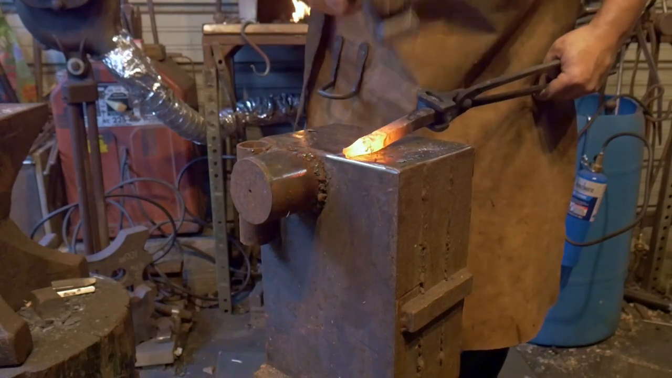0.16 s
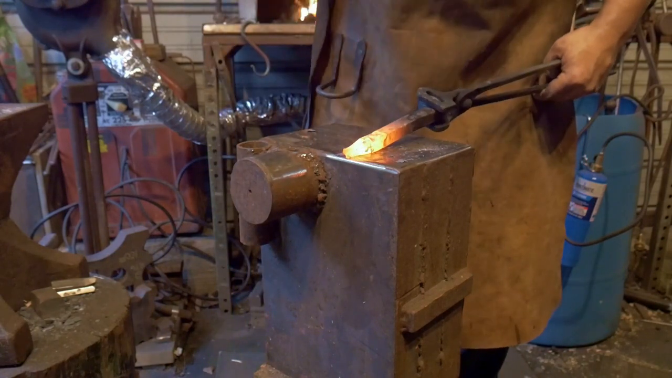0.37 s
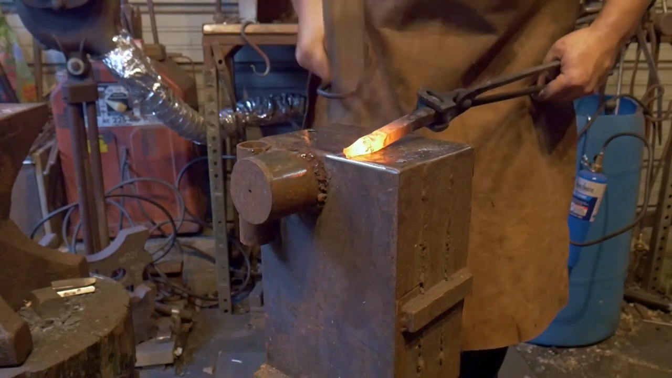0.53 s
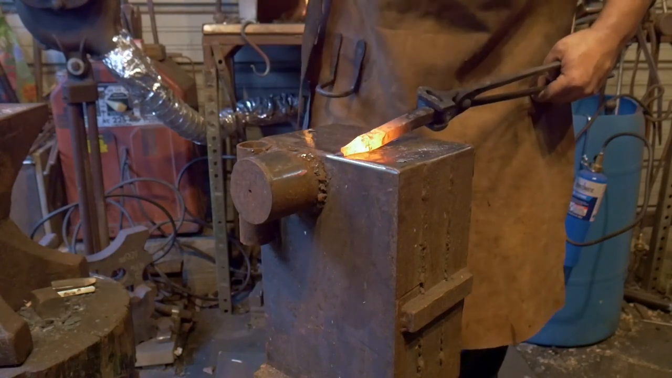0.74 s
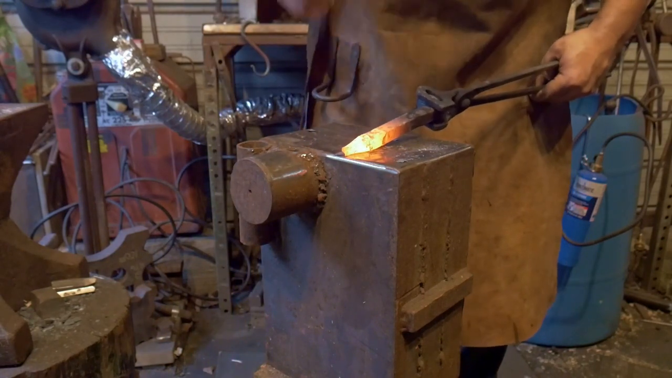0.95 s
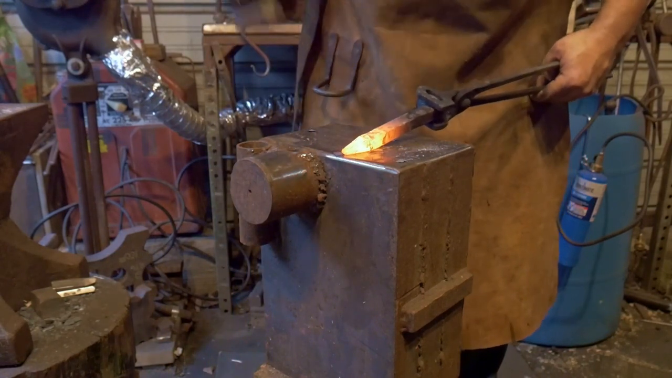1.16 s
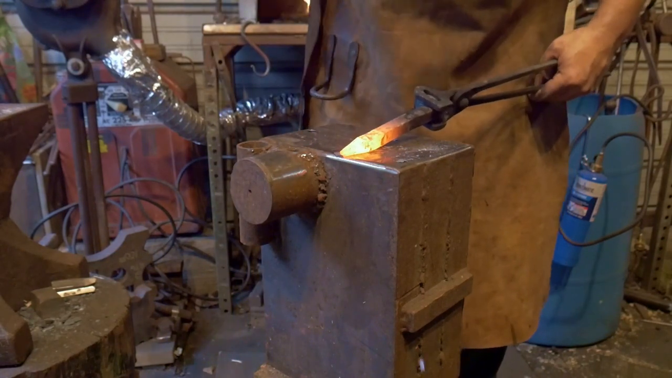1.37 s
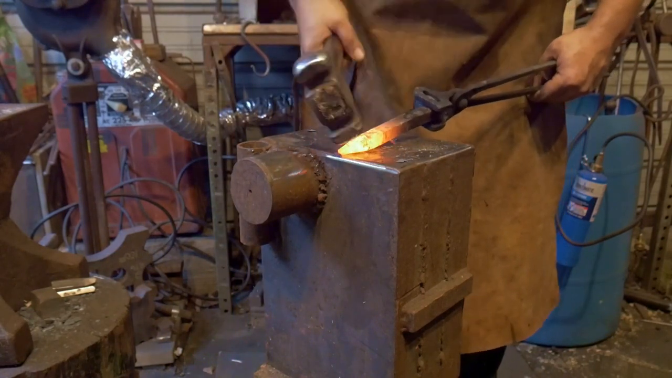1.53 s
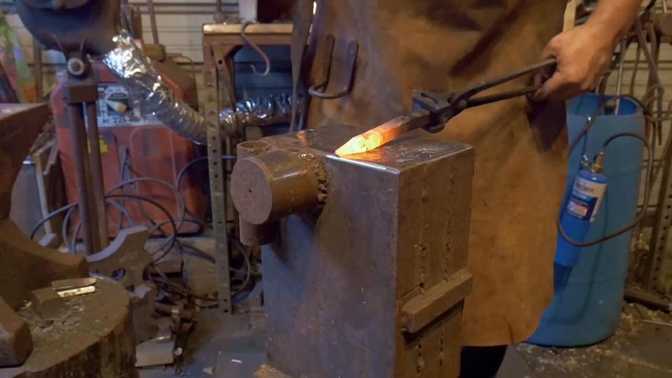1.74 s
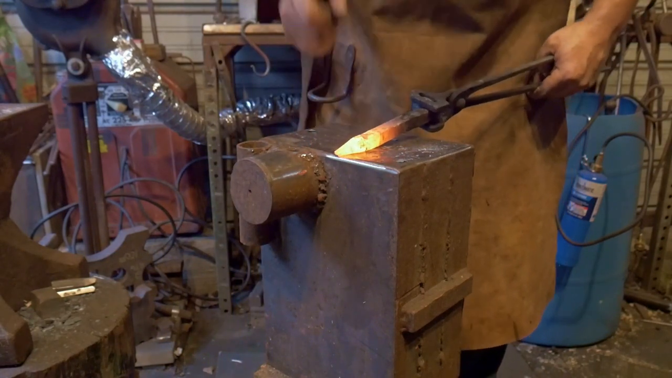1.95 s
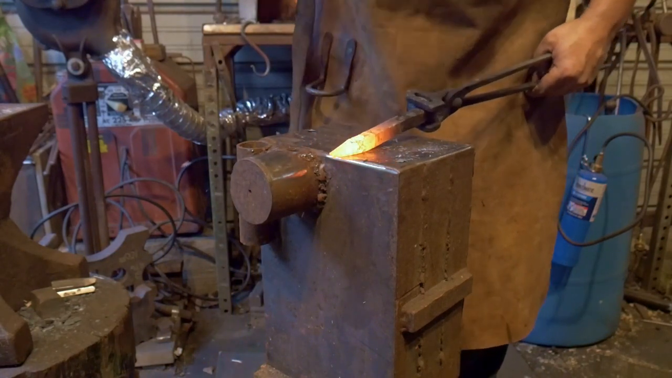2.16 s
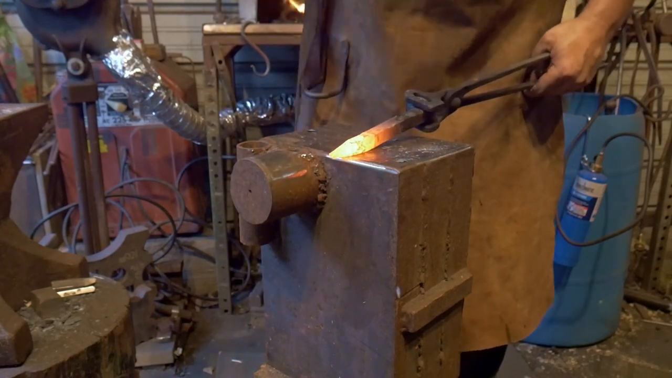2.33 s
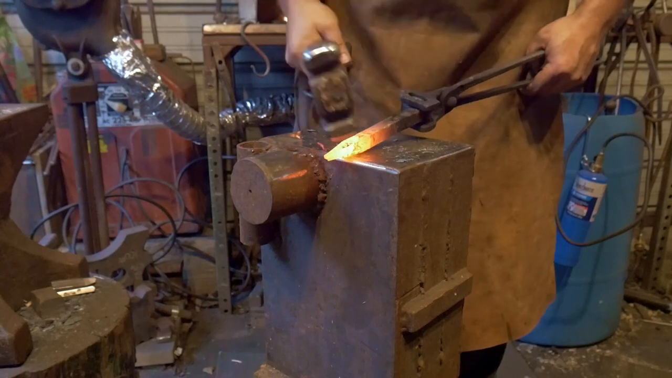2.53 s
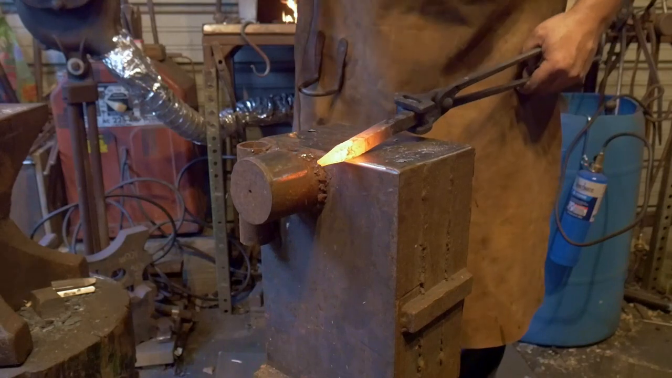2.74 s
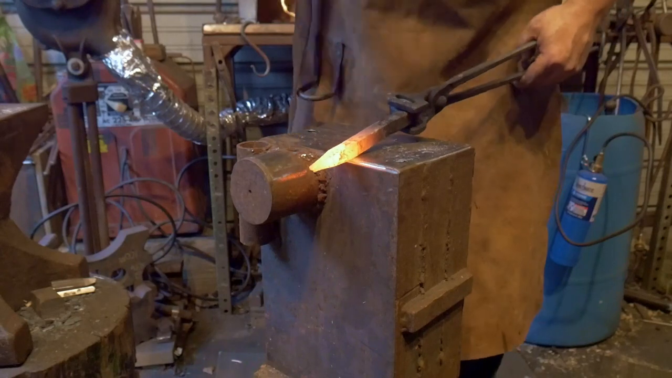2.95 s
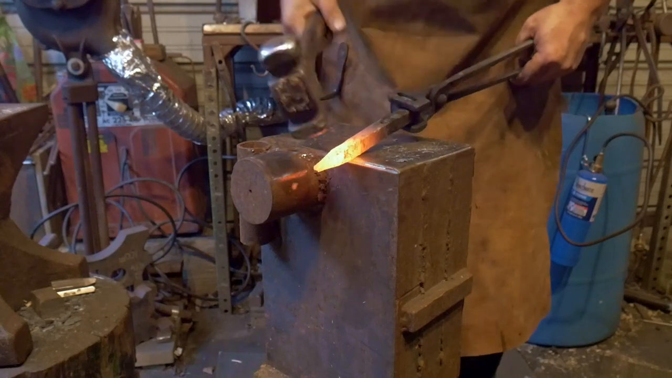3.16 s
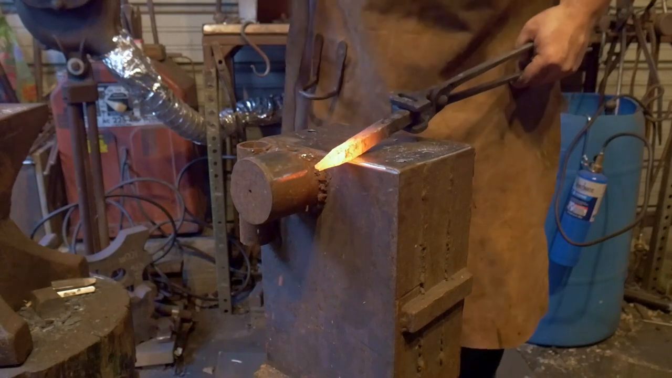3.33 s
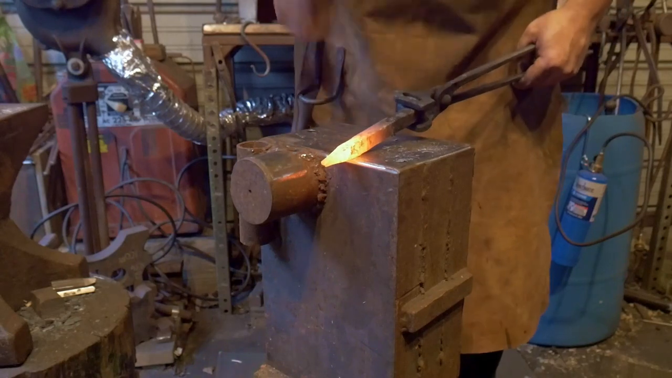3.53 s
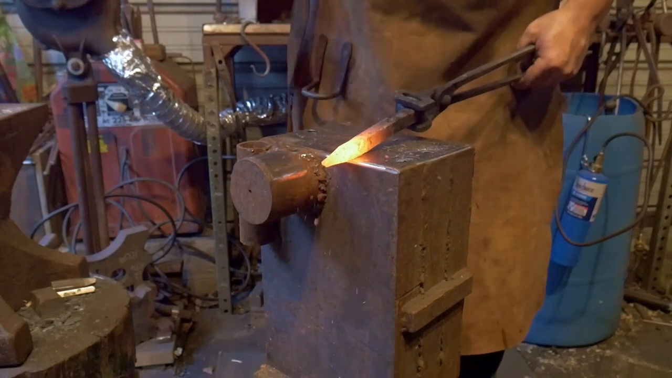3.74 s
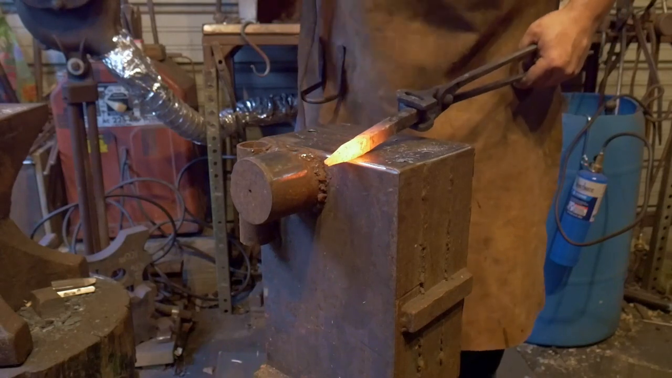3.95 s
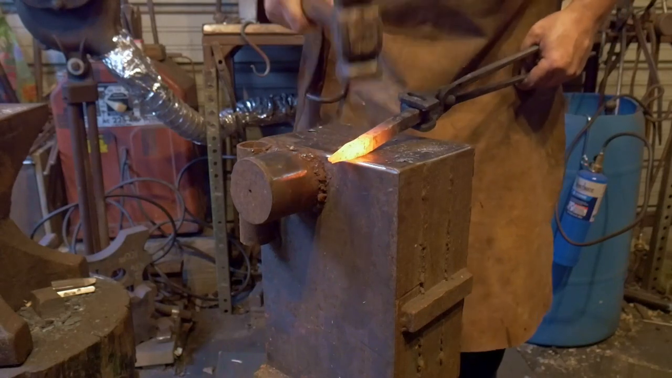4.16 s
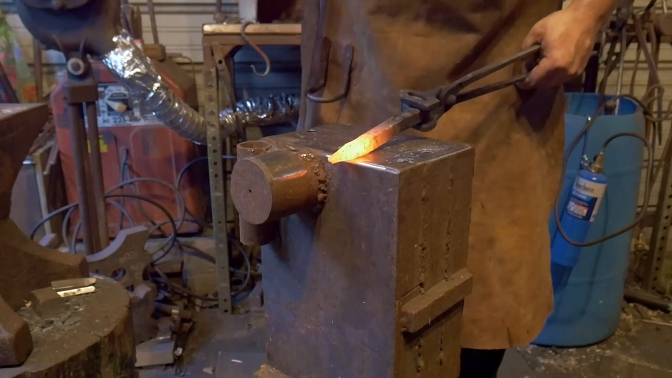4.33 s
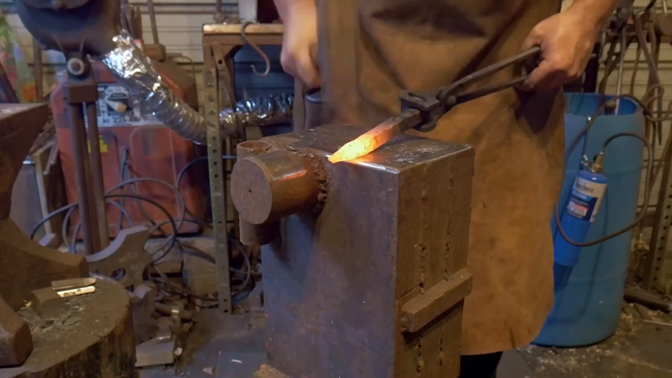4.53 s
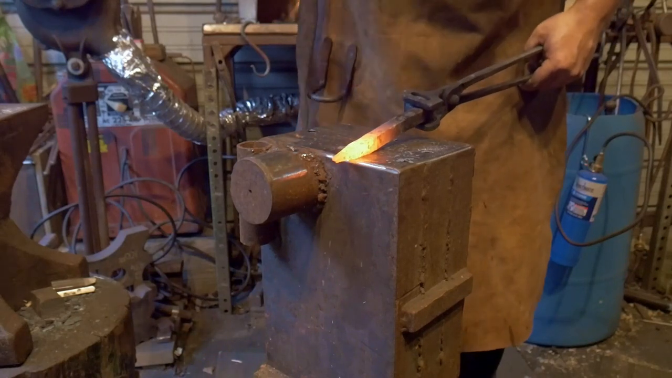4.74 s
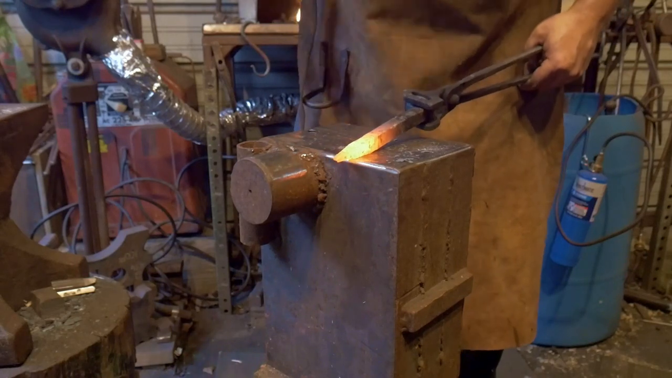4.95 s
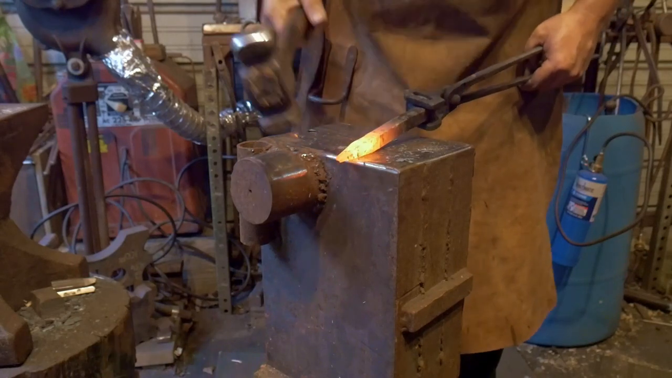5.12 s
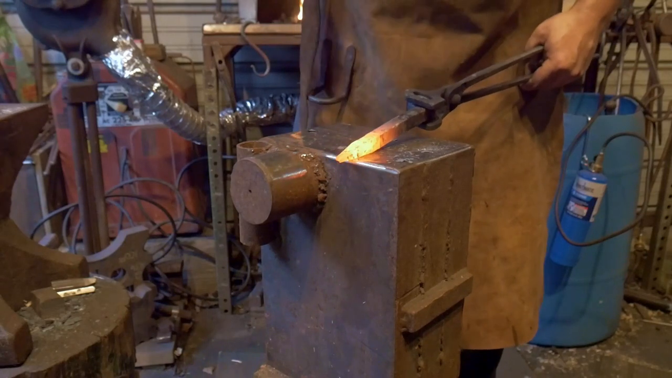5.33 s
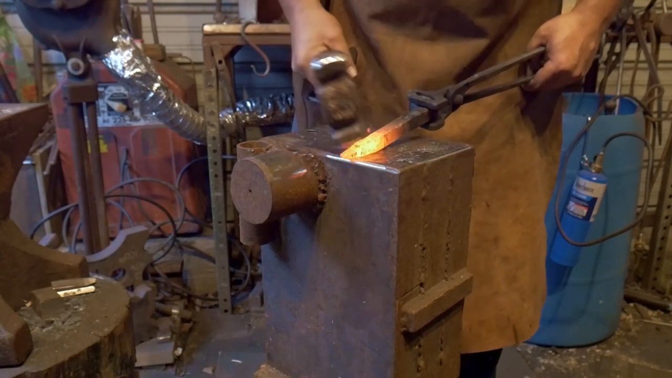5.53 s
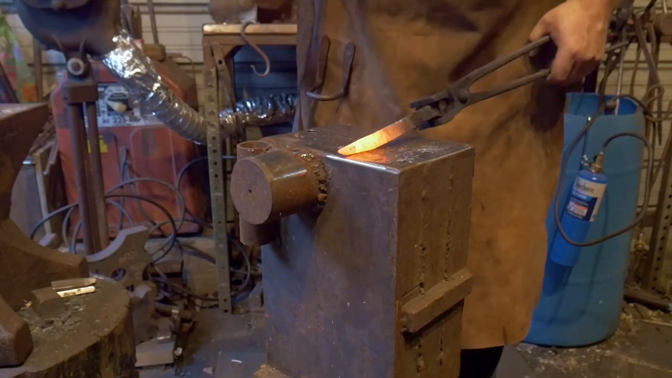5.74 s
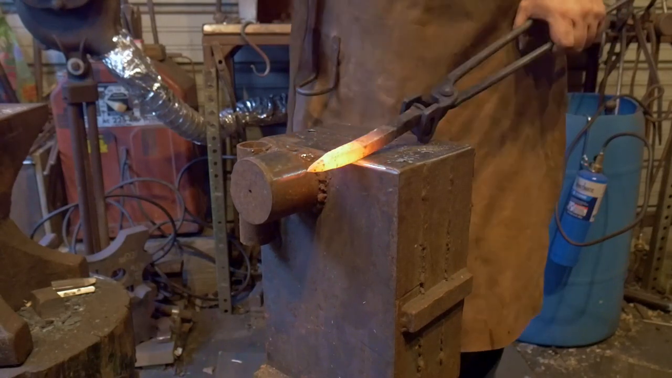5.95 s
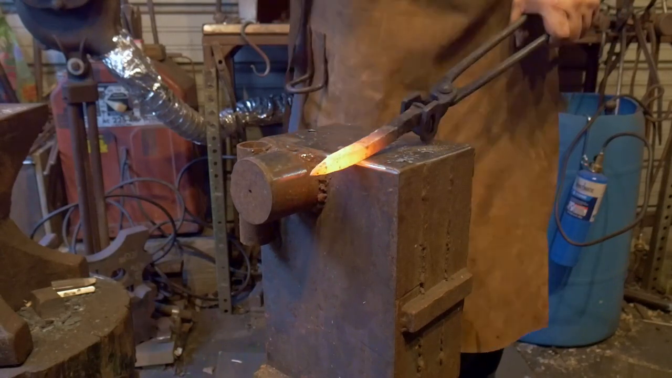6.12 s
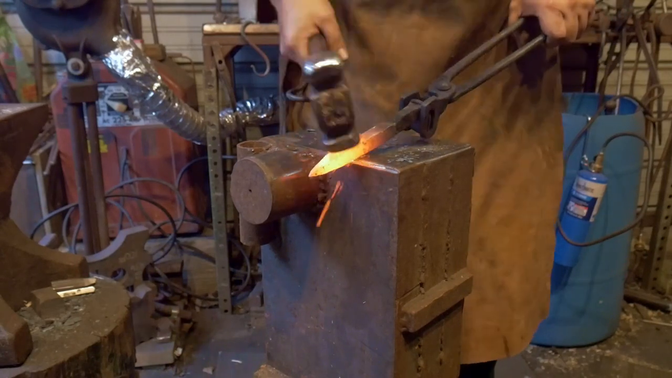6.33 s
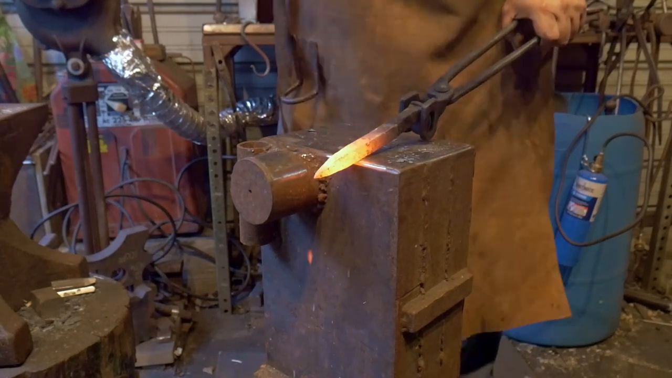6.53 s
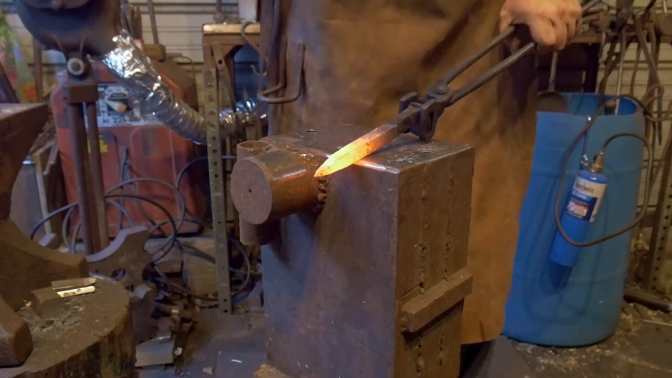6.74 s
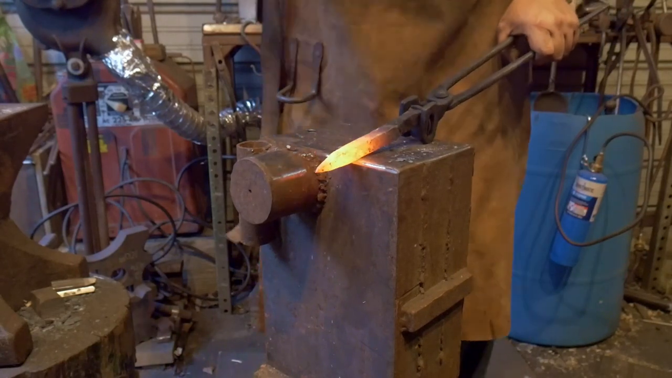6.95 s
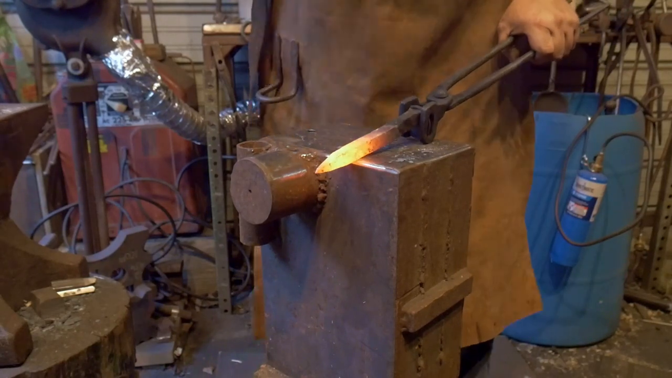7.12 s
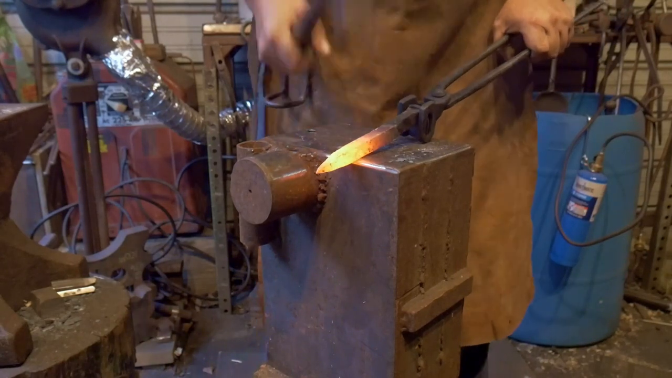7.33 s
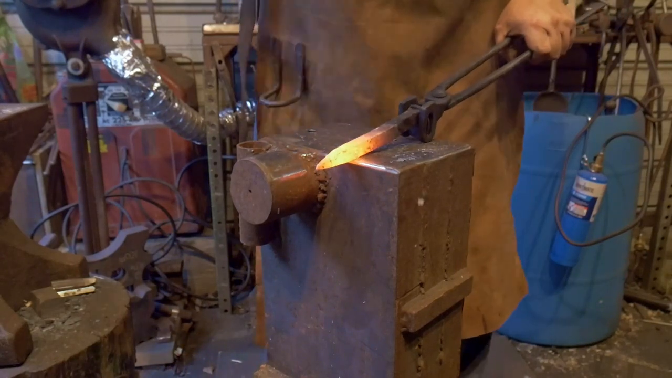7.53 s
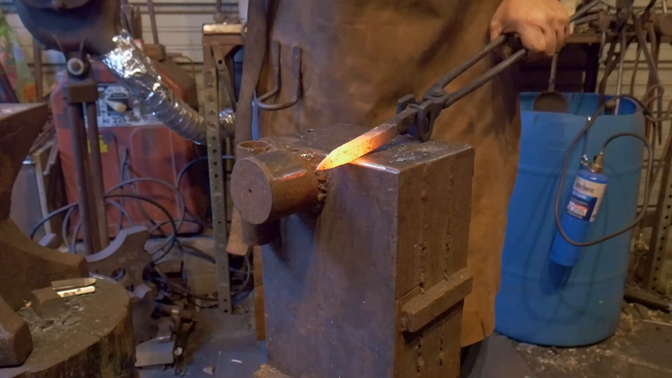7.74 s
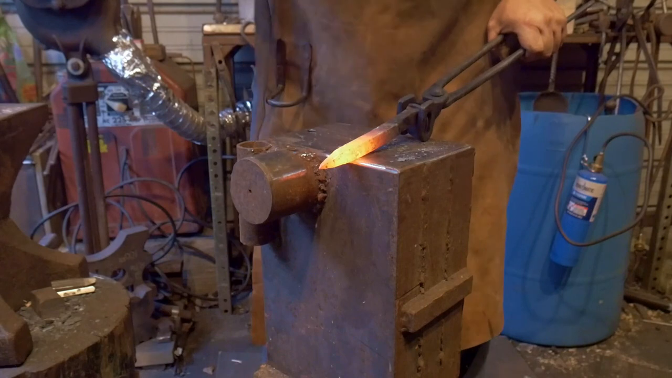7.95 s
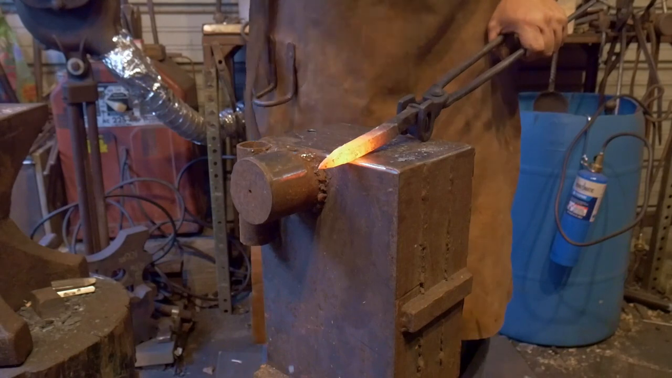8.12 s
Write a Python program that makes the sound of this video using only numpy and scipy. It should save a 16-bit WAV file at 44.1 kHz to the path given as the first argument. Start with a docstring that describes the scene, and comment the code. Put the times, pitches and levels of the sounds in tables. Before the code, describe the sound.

In a small workshop, a smith hammers a hot steel bar on a heavy block anvil, about two blows a second. Each is a loud, dry knock and bright crack with a tiny zing, then a thin high ring fading within half a second. Twelve blows come, a slightly longer pause with a quick cloth rustle, then four brighter ones. A forge murmurs faintly. The microphone is close, with hard, slightly clipped peaks.

```python
"""Smith at a block anvil

A smith draws out a hot steel bar: sixteen hand-hammer blows in a small workshop, a forge murmuring behind.
Each blow is a dull knock and a ring (dying sines), a crack of steel on steel (shaped noise) and a short zing.
Single echoes and a diffuse noise tail answer it; soft bumps and one sleeve brush are filtered noise.
The microphone limits and clips the peaks."""
import sys
import numpy as np
from scipy import signal
from scipy.fft import rfft, irfft
from scipy.io import wavfile
from scipy.ndimage import uniform_filter1d

SR = 44100
rng = np.random.default_rng(int(sys.argv[2]) if len(sys.argv) > 2 else 0)


def transcribe(signal):
    """Save signal, clipped to [-1, 1], as a 16-bit WAV file at the path in sys.argv[1]."""
    frames = np.atleast_2d(signal).T
    limited = np.clip(frames, -1, 1)
    pcm = np.round(limited * 32767).astype(np.int16)
    wavfile.write(sys.argv[1], SR, pcm)


N = 360738


def amp(db):
    """Decibels to gain."""
    return 10 ** (np.asarray(db) / 20)


def unit(x):
    """Scales to rms 1."""
    return x / np.sqrt(np.mean(x ** 2) + 1e-20)


def read(points, hz, axis=1):
    """One column of a table, joined by straight lines over log frequency."""
    columns = np.transpose(points)
    return np.interp(np.log(hz + 1), np.log(columns[0] + 1), columns[axis])


def add(mix, start_s, sound):
    """Lays a sound into the mix at start_s, cut off at the end of the mix."""
    start = max(round(start_s * SR), 0)
    part = mix[..., start:][..., :sound.shape[-1]]
    part += sound[..., :part.shape[-1]]


def noise(points):
    """Steady noise of rms 1 with the given spectrum."""
    gain = amp(read(points, np.fft.rfftfreq(N, 1 / SR)))
    return unit(irfft(rfft(rng.standard_normal(N)) * gain, N))


def colour(x, points, tilt_db_per_octave, size=1024):
    """Minimum-phase filter with the given spectrum, tilted about 6 kHz; the tilt stops below 1.5 kHz."""
    hz = abs(np.fft.fftfreq(size, 1 / SR))
    tilt_db = tilt_db_per_octave * np.log2(np.maximum(hz, 1500) / 6000)
    log_gain = np.log(amp(read(points, hz) + tilt_db))
    taps = np.fft.ifft(np.exp(np.conj(signal.hilbert(log_gain)))).real
    return signal.fftconvolve(x, taps)[:len(x)]


def modes(table, gains_db, phases, t):
    """Sum of sines, each dying by 60 dB in its t60."""
    hz, level_db, t60_s = np.transpose(table)[:, :, None]
    decay = np.exp(-np.log(1000) * t / t60_s)
    sines = np.sin(2 * np.pi * hz * t + phases[:, None])
    return (amp(level_db + gains_db[:, None]) * decay * sines).sum(0)


def forge(mid_rms_db=-51.5):
    """A soft, steady roar: noise partly alike in both ears, less so towards the treble."""
    # relative spectrum of the roar: hz, level_db (density per Hz)
    roar_spectrum = [(18, -44.5), (30, -16.5), (200, -3), (274, -7.5), (662, -8.5), (735, -9),
                     (1000, -13.5), (1090, -13.5), (1370, -14), (2430, -21.5), (2840, -20), (3880, -24.5),
                     (5880, -29), (6700, -28.5), (15000, -45.5)]
    # left-right correlation: hz, likeness (0 to 1)
    ear_likeness = [(60, 0.5), (180, 0.93), (550, 0.82), (1650, 0.68), (5000, .55), (15000, .4)]
    likeness = np.clip(read(ear_likeness, np.fft.rfftfreq(N, 1 / SR)), 0, 1)
    side_gain = np.sqrt((1 - likeness) / (1 + likeness))
    mid = noise(roar_spectrum)
    side = irfft(rfft(noise(roar_spectrum)) * side_gain, N)
    return amp(mid_rms_db) * np.array([mid + side, mid - side])


def knock(weight_db, hardness_db_per_octave, t, radiate_hz=290):
    """The blow shoves the block; cooler steel shortens the contact and favours the higher modes."""
    # heavily damped modes of block, bar and hammer while pressed together: hz, level_db, t60_s
    pressed_modes = [(500, -12, 0.017), (698.6, -19.5, 0.079), (991, -8, 0.015), (1237, -12.5, 0.027),
                     (1448, -10.5, 0.0095), (1605, -12.5, 0.0097), (2901, -21.5, 0.025)]
    octaves = np.clip(np.log2(np.transpose(pressed_modes)[0] / 900), -1, 1)
    gains_db = weight_db + hardness_db_per_octave * octaves
    shove = modes(pressed_modes, gains_db, np.zeros(len(pressed_modes)), t)
    # a block radiates little bass
    radiation = signal.butter(2, radiate_hz, "high", fs=SR, output="sos")
    return signal.sosfilt(radiation, shove)


def brightness(start_s, crack_db):
    """Crack tilt in dB an octave: brighter when loud, and once the bar is tipped over the block's edge."""
    tipped_s, tipped_db_per_octave = 6.0, 3  # tipped in the pause, as the smith lifts the tongs
    tilt_at_0_db, tilt_per_db = -1.21, 0.22
    return tilt_at_0_db + tilt_per_db * crack_db + tipped_db_per_octave * (start_s > tipped_s)


def crack(level_db, tilt_db_per_octave, t, contact_s=0.0017, after_db=-16, after_s=0.0062, fade_s=0.022):
    """Scale shatters and the steel faces grind: a contact burst of noise with a weaker, longer tail."""
    # colour of the crack before tilt: hz, level_db
    crack_spectrum = [(150, -37.5), (500, -4.5), (1500, 4), (2200, -2), (3000, 1.5), (4800, -1),
                      (6500, -0.5), (9700, -2), (12000, -7.5), (15000, -14.5)]
    press = np.exp(-(t / contact_s) ** 2 / 2) + amp(after_db) * np.exp(-t / after_s)
    burst = rng.standard_normal(len(t)) * press
    for _ in range(2):  # countless tiny fractures fill the spectrum fairly evenly: keep only the phases
        flat = irfft(np.exp(1j * np.angle(rfft(burst))), len(t))
        burst = flat * np.exp(-t / fade_s)
    burst *= np.linalg.norm(press) / np.linalg.norm(burst)
    return amp(level_db) * colour(burst, crack_spectrum, tilt_db_per_octave)


def zing(level_db, t, scatter_db=4.5):
    """The hammer face sings for an instant, each mode at a little different level at each blow."""
    # brief, bright modes beamed at the microphone: hz, level_db, t60_s
    face_modes = [(3003, -17, 0.02), (5970, -8.5, 0.012), (9920, -7.5, .018)]
    gains_db = level_db + scatter_db * rng.standard_normal(len(face_modes))
    return modes(face_modes, gains_db, np.zeros(len(face_modes)), t)


def ring(weight_db, spot_db, t, scatter_db=0.5):
    """Anvil, hammer and tongs ring freely; where the hammer lands sets how strongly each mode group rings."""
    # free modes after the blow: hz, level_db, t60_s
    free_modes = [(301, -45, .42), (339, -43, .42), (554, -44, .38), (640, -41, .38), (694, -42, .42),
                  (732, -42, .42), (1022, -42, .42), (1098, -37, .52), (1141, -38, .42), (1191, -37, .47),
                  (1230, -38, .52), (1275, -42, .42), (1475, -57, 2.5), (1507, -42, .4), (3520, -62, 1.6),
                  (6210, -48, .45), (11030, -49, .4), (11450, -49, .38), (2786, -43, .5), (2826, -37, .45),
                  (2858, -36, .48), (2990, -43, .48), (11880, -60, .75), (5749, -41, .78), (5792, -39, .45),
                  (5813, -31, .38), (7052, -39, .48), (7495, -37, .46)]
    # hz, gain_db
    groups = [(1500, weight_db), (2800, spot_db[0]), (5800, spot_db[1]), (7100, spot_db[2]), (11000, 0)]
    gains_db = read(groups, np.transpose(free_modes)[0])
    gains_db = gains_db + scatter_db * rng.standard_normal(len(free_modes))
    phases = rng.uniform(0, 2 * np.pi, len(free_modes))
    return modes(free_modes, gains_db, phases, t)


def echoes(x, low_hz=900, high_hz=1700):
    """Single reflections, band-limited: only the middle, about 0.9 to 1.7 kHz, comes back."""
    # first echoes from floor, bench and wall: delay_s, level_db, balance_db (left over right)
    reflections = [(.0062, -25, 4.5), (0.0123, -15, -7), (.0147, -14.5, 5), (.0385, -32, 13.5),
                   (0.085, -49, 0), (0.12, -24.5, 1)]
    band = signal.butter(1, [low_hz, high_hz], "band", fs=SR, output="sos")
    middle = signal.sosfilt(band, x)
    out = np.zeros((2, N))
    for delay_s, level_db, balance_db in reflections:
        ears_db = [[level_db + balance_db / 2], [level_db - balance_db / 2]]
        add(out, delay_s, amp(ears_db) * middle)
    return out


def workshop(x, walls, side_db=-8.0, build_s=0.0034, steady_hz=3800, size=256):
    """Diffuse reverberation, each band dying at its own speed.

    Long waves take the same paths at every blow; short waves take new ones as arm, bar and hammer move."""
    # what the workshop gives back: hz, level_db, t60_s
    room_bands = [(102.4, 6, 0.4), (308, -16, 0.14), (480, -3.5, 0.31), (900, -16.5, 0.62),
                  (1209, -2, 0.49), (1480, -15.5, 0.51), (2170, -6, 0.51), (2660, -3.5, .52),
                  (3470, -9, 0.5), (6450, -5.5, 0.49), (10300, -7, 0.43), (15000, -12.5, 0.32)]
    moving = rng.choice([-1., 1.], walls.shape)
    hz, t, spectra = signal.stft(np.array([walls, moving]), SR, nperseg=size)
    same = np.exp(-(hz[:, None] / steady_hz) ** 2 / 2)
    mixed = same * spectra[0] + np.sqrt(1 - same ** 2) * spectra[1]
    rate = np.log(1000) / read(room_bands, hz, axis=2)[:, None]
    # the root evens out the energy of slow and fast decays
    shape = amp(read(room_bands, hz))[:, None] * np.exp(-rate * t) * np.sqrt(2 * rate / SR)
    tails = signal.istft(mixed * shape, SR, nperseg=size)[1][:, :SR]
    tails = tails * (1 - np.exp(-(np.arange(SR) / SR / build_s) ** 2))
    mid, side = signal.fftconvolve(x[None], tails, axes=1)
    return np.array([mid + amp(side_db) * side, mid - amp(side_db) * side])


def bumps(trim_db=-9, rise_s=0.026, low_hz=120, high_hz=260):
    """Soft low thuds as the smith shifts his stance: dull noise in brief swells."""
    # start_s, level_db (swell peak before trim_db)
    stance_shifts = [(1.327, -42), (4.48, -40), (6.08, -47)]
    swell, t = np.zeros(N), np.arange(SR // 4) / SR
    for start_s, level_db in stance_shifts:
        add(swell, start_s, amp(level_db + trim_db) * t / rise_s * np.exp(1 - t / rise_s))
    dull = signal.butter(2, [low_hz, high_hz], "band", fs=SR, output="sos")
    rumble = unit(signal.sosfilt(dull, rng.standard_normal(N)))
    return signal.sosfilt(dull, swell * rumble)


def rustle(full_s=6.305, level_db=-48, hold_s=0.065, rise_db_per_s=279, fall_db_per_s=593.5):
    """Sleeve and apron brush once as the smith swings again: noise swells, holds and quickly fades."""
    # relative colour of rustling cloth and leather: hz, level_db
    cloth_spectrum = [(100, 2), (400, 5), (1300, -4.5), (3000, -7.5), (5000, -13.5), (9000, -18),
                      (15000, -40.5)]
    t = np.arange(N) / SR - full_s
    down_db = rise_db_per_s * np.maximum(-t, 0) + fall_db_per_s * np.maximum(t - hold_s, 0)
    return amp(level_db - down_db) * noise(cloth_spectrum)


def scene(ring_room_db=-7.0, crack_side_db=-16):
    """Blows near the middle, with the workshop and the forge around them."""
    # blows: start_s, weight_db, hardness_db_per_octave, crack_db, ring_2900_hz_db, ring_5800_hz_db, ring_7300_hz_db
    blows = [(0.1323, 2, 8, -2, -1, 0, -9), (0.6219, 1, 11, -3, 1, -4.5, 2),
             (1.0981, 2, 0.5, -5.5, -3.5, -2.5, 5), (1.5906, 1.5, 10.5, 2.5, 9, 5.5, -14),
             (2.0711, -1, 9.5, 1, 3.5, 1, 1), (2.5914, -1, 11.5, 1.5, 5, 4, -0.5),
             (3.1645, 1, 3.5, -1, -6.5, -2, -11), (3.6666, 1, 9, 2.5, 2.5, 0, 9),
             (4.1375, 3, 3.5, 5.5, 2.5, 0, -5), (4.6225, 0, 11, 2.6, 5.5, 4.5, 13),
             (5.1187, 2, 5, -2, 0, 5, -15), (5.609, -0.5, 0, -0.6, -1, 4, -14.5),
             (6.3863, -1, 4.5, 0.5, -7, 0.5, 9.5), (6.9088, 2, 7, 1.5, -4, -3.5, 7.5),
             (7.4159, 2.5, 5.5, 3.5, 3, -5, 7), (7.9119, 3.9, 7, 4.5, -14.5, -1, 2)]
    hits, rings, zings, side = np.zeros((4, N))
    room = np.zeros((2, N))
    walls = rng.choice([-1., 1.], (2, SR))  # dense reflections of random sign
    short, long = np.arange(SR // 10) / SR, np.arange(SR * 3 // 2) / SR
    for start_s, weight_db, hardness_db_per_octave, crack_db, *spot_db in blows:
        tilt = brightness(start_s, crack_db)
        hit = knock(weight_db, hardness_db_per_octave, short) + crack(crack_db, tilt, short)
        ringing = ring(weight_db, spot_db, long)
        add(hits, start_s, hit)
        add(rings, start_s, ringing)
        add(zings, start_s, zing(crack_db, short))
        # left and right hear the splinters a little differently
        add(side, start_s, crack(crack_db + crack_side_db, tilt, short))
        radiated = np.pad(hit, (0, len(long) - len(short))) + amp(ring_room_db) * ringing
        add(room, start_s, workshop(radiated, walls))
    near = hits + zings + rings + rustle() + bumps() + np.array([side, -side])
    return near + echoes(hits) + room + forge()


def limit(x, threshold_db=-3.5, recovery_db_per_s=27, size=100):
    """Limiter: the gain ducks within about a millisecond and recovers at a steady rate; size in samples."""
    power = uniform_filter1d((x ** 2).mean(0), size)
    power_db = 10 * np.log10(abs(power) + 1e-12)
    fall_db = np.arange(N) / SR * recovery_db_per_s
    held_db = np.maximum.accumulate(power_db + fall_db) - fall_db
    over_db = np.maximum(held_db - threshold_db, 0)
    return x / amp(uniform_filter1d(over_db, size))


def record(dry, notch_hz=7850, notch_width_hz=170, ceiling=0.7, low_cut_hz=70, edge_hz=15600):
    """The microphone has one narrow notch; peaks are limited and clipped; then low cut and band limit."""
    notch = signal.iirnotch(notch_hz, notch_hz / notch_width_hz, SR)
    heard = signal.lfilter(*notch, dry)
    clipped = np.clip(limit(heard), -ceiling, ceiling)
    low_cut = signal.butter(2, low_cut_hz, "high", fs=SR, output="sos")
    lean = signal.sosfilt(low_cut, clipped)
    band_limit = signal.firwin(255, edge_hz, window=("kaiser", 8), fs=SR)
    return signal.oaconvolve(lean, band_limit[None], "same")


dry = scene()
out = record(dry)
transcribe(out)
```